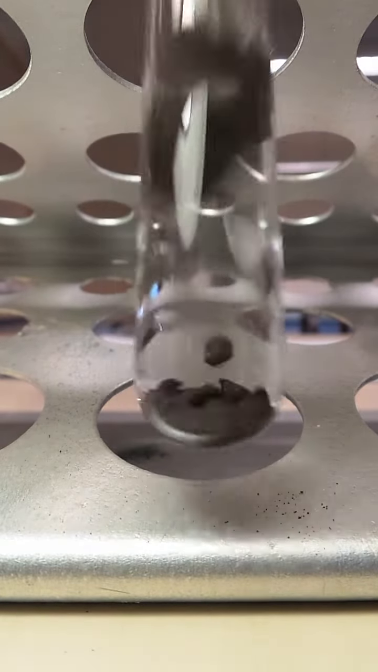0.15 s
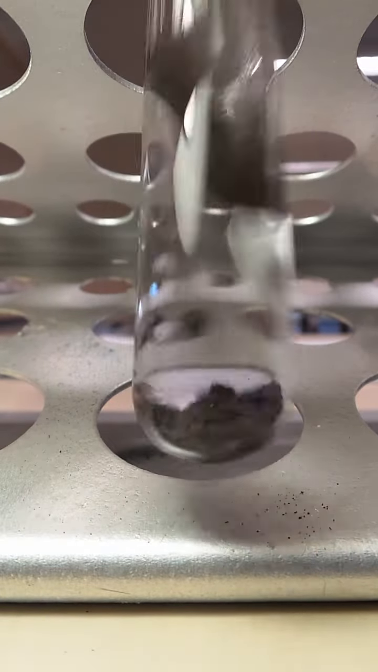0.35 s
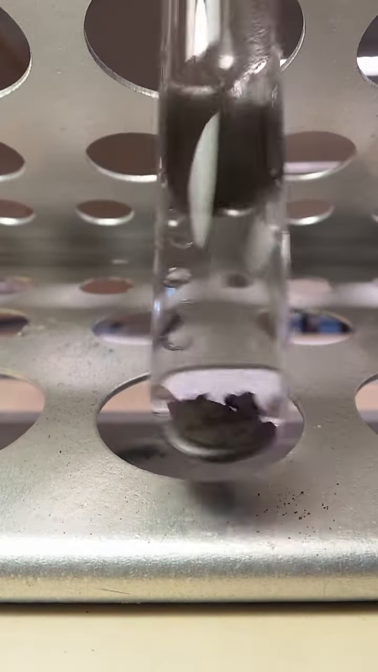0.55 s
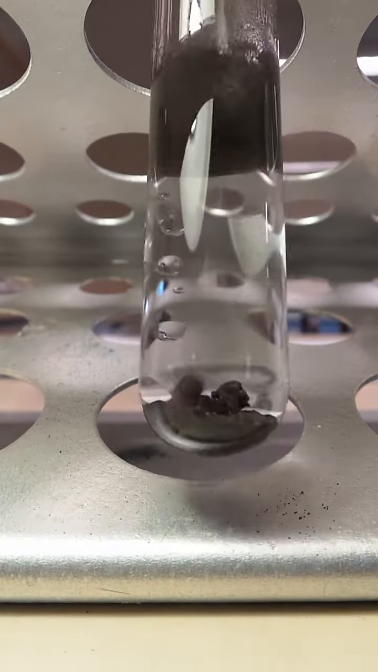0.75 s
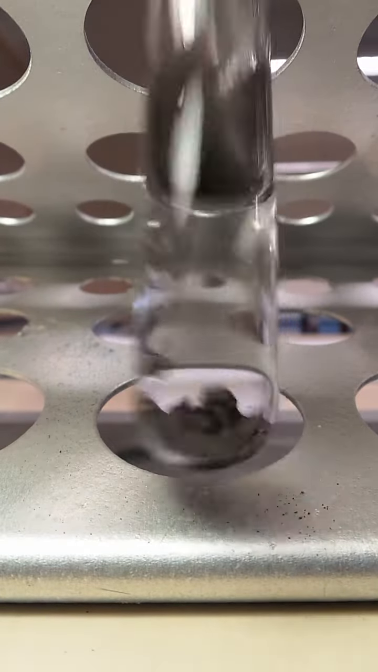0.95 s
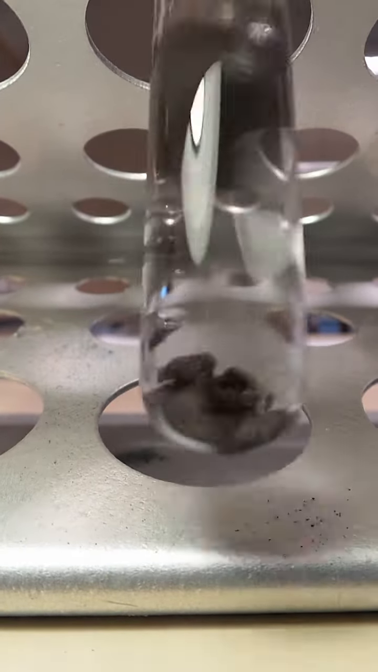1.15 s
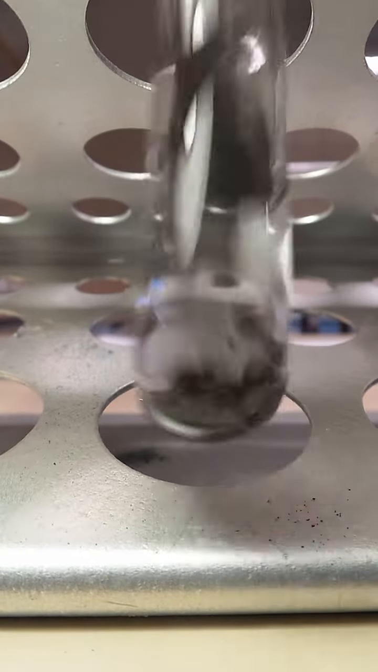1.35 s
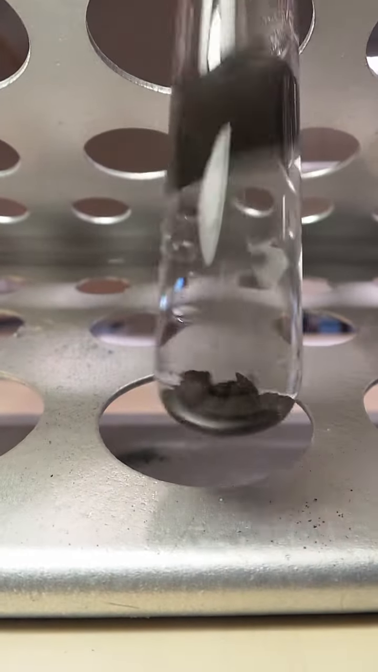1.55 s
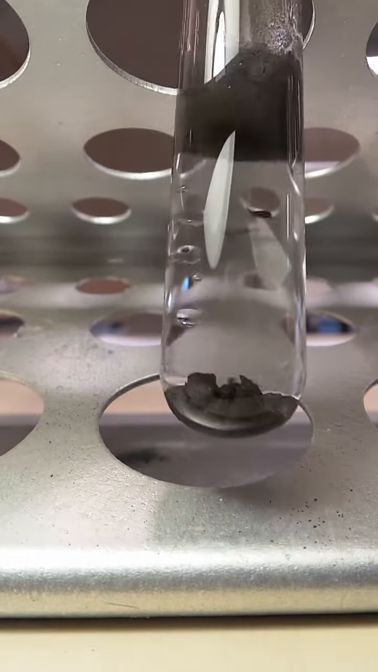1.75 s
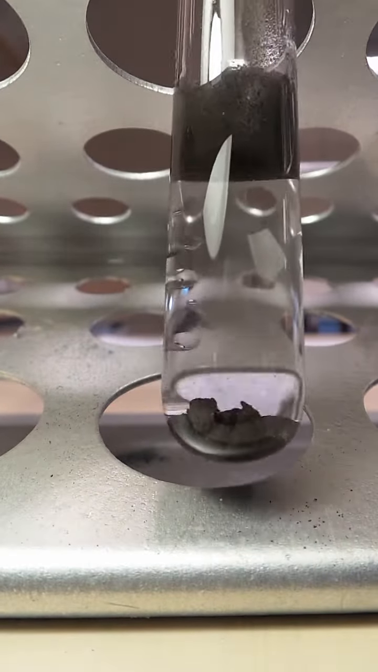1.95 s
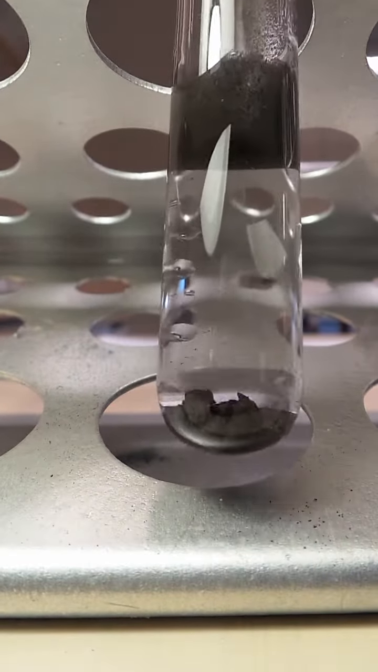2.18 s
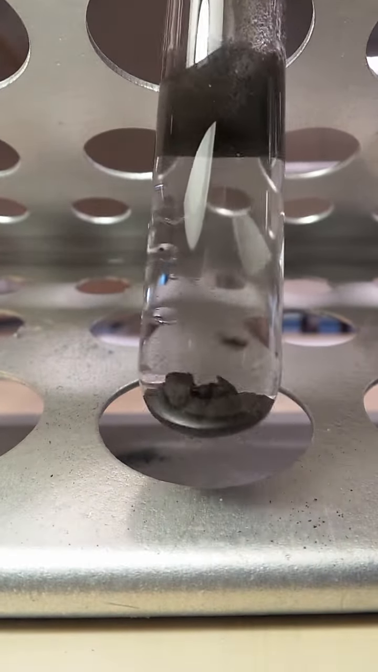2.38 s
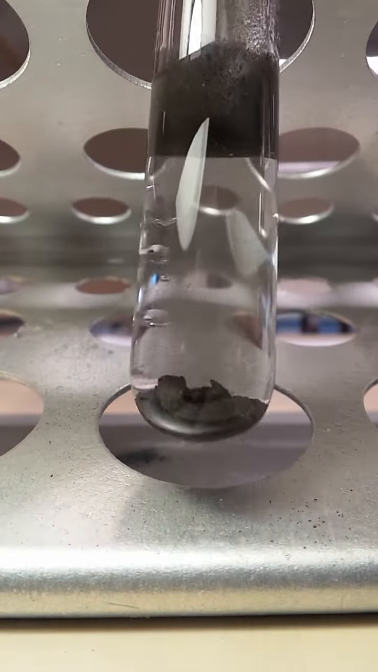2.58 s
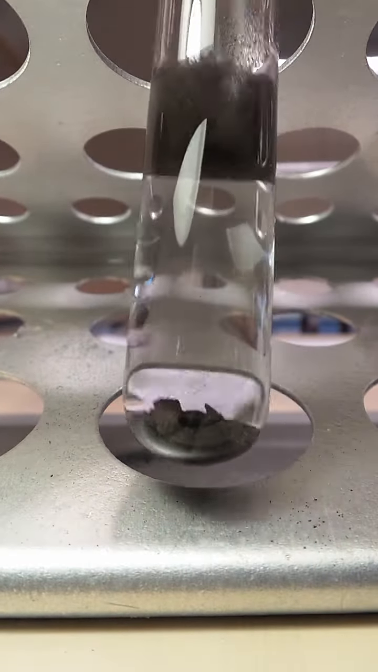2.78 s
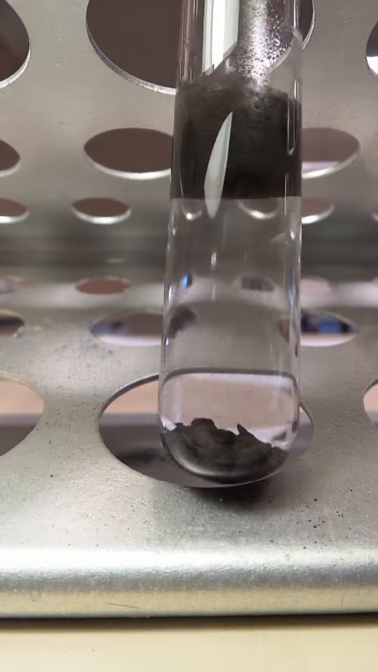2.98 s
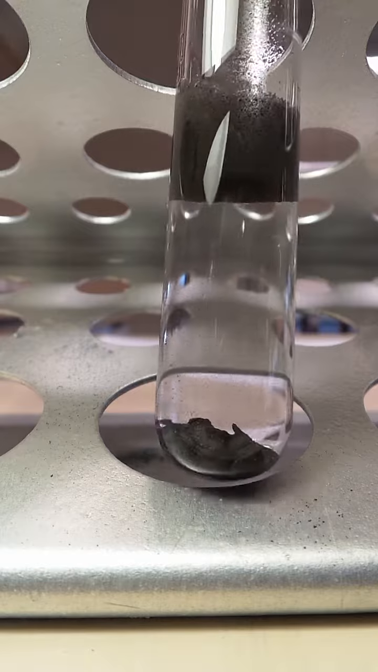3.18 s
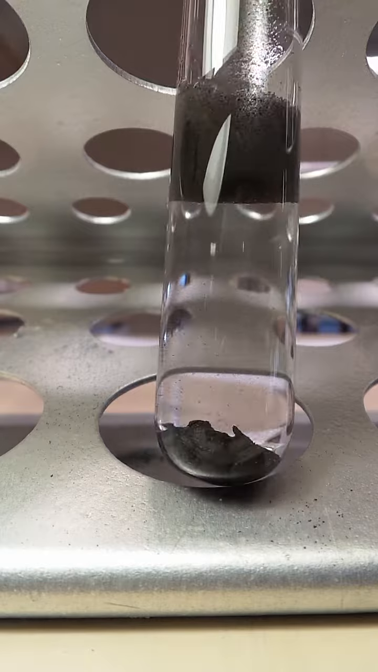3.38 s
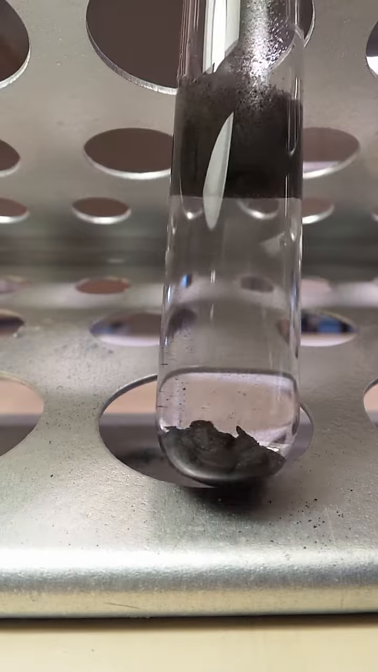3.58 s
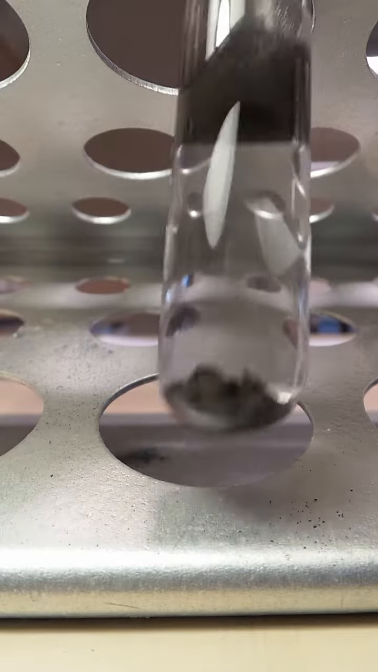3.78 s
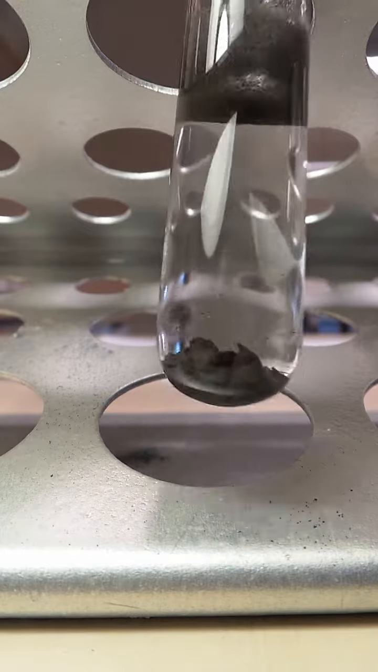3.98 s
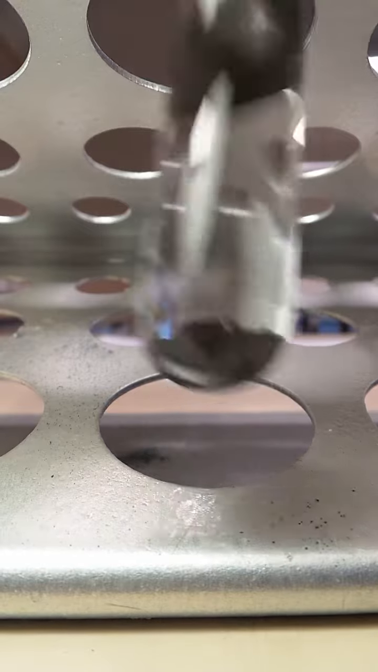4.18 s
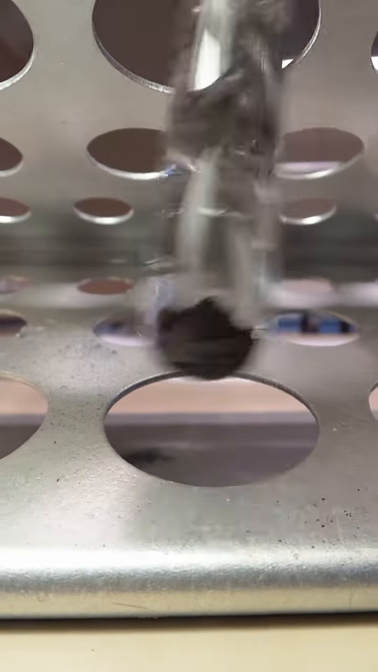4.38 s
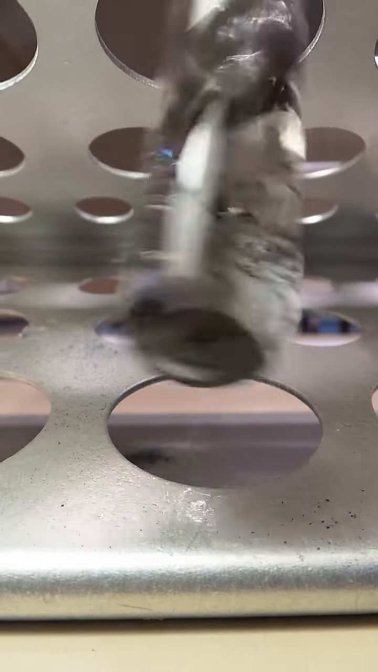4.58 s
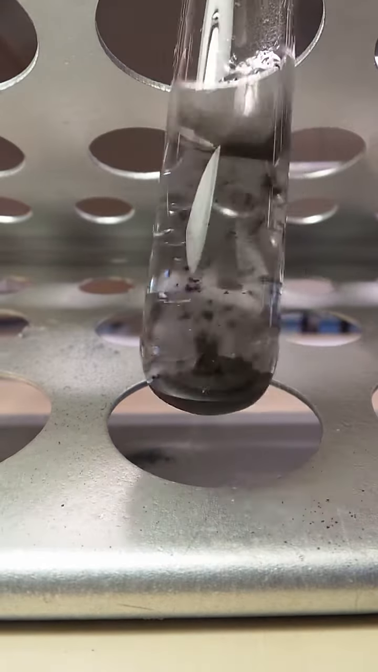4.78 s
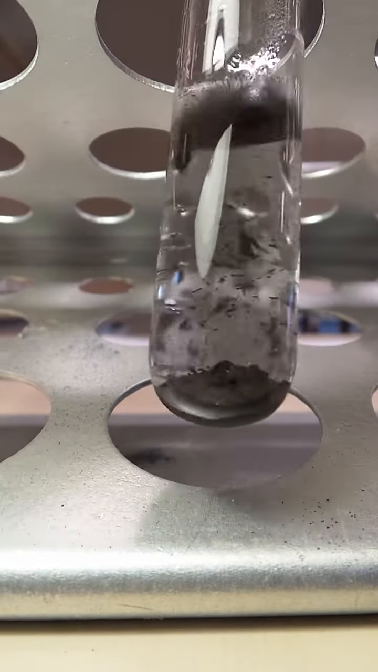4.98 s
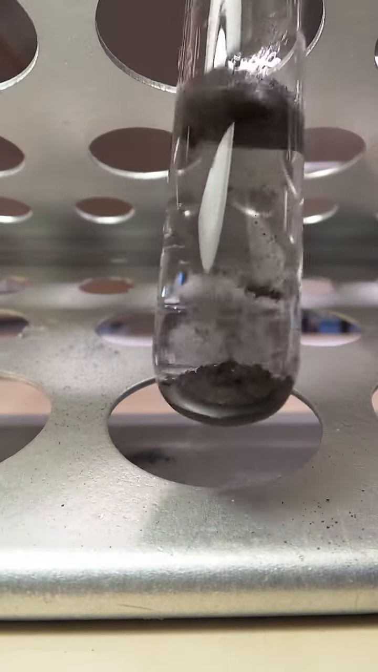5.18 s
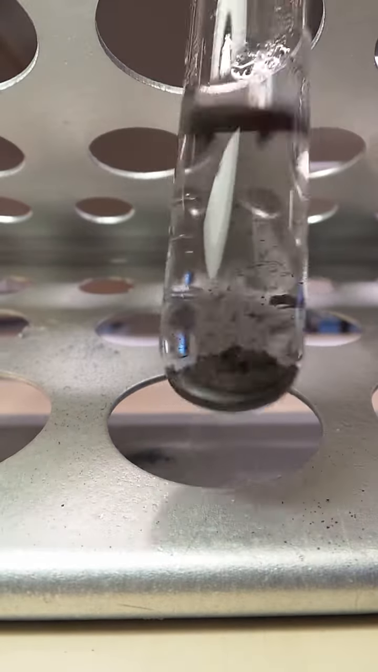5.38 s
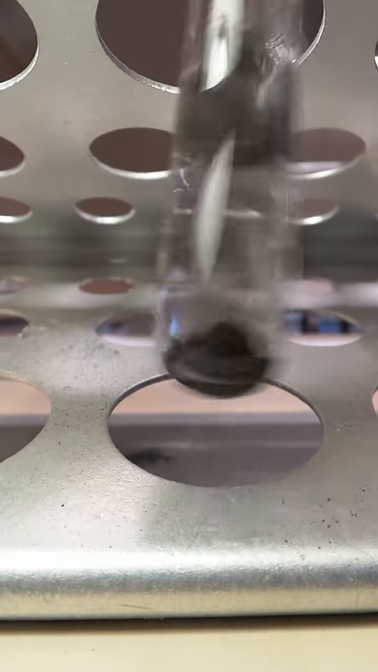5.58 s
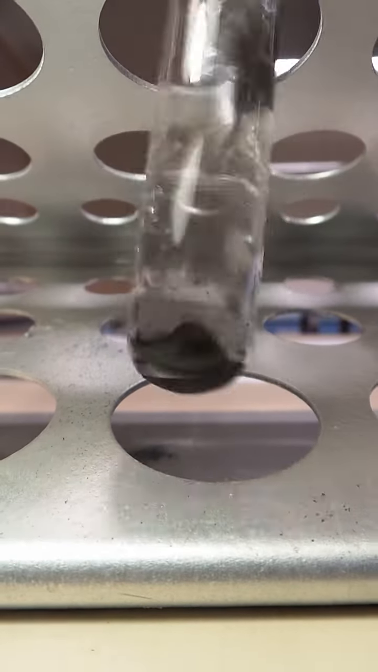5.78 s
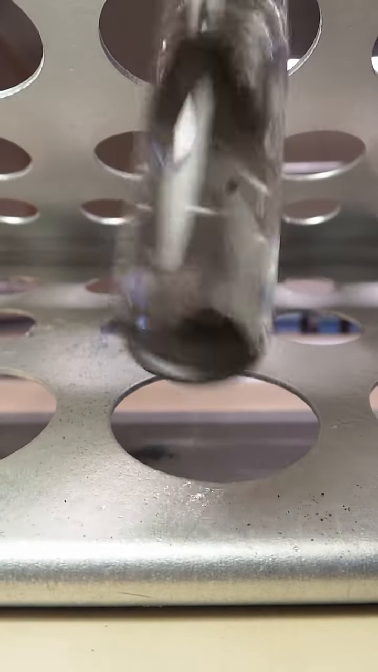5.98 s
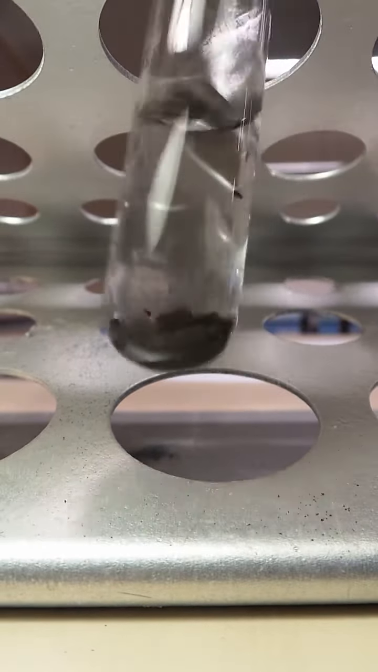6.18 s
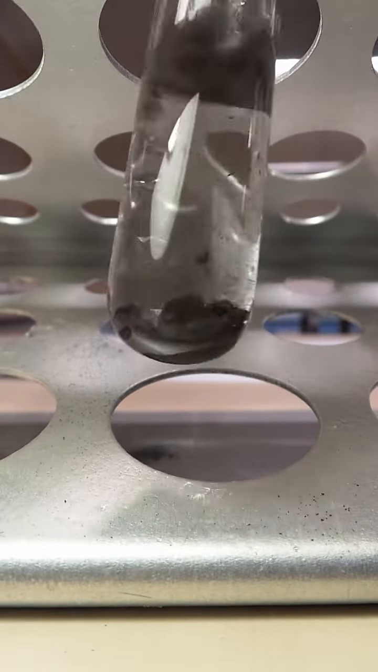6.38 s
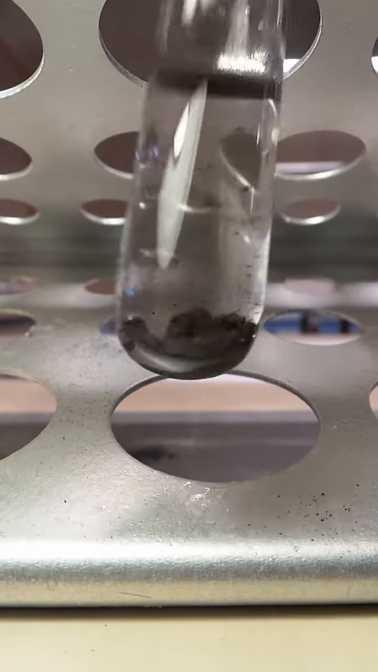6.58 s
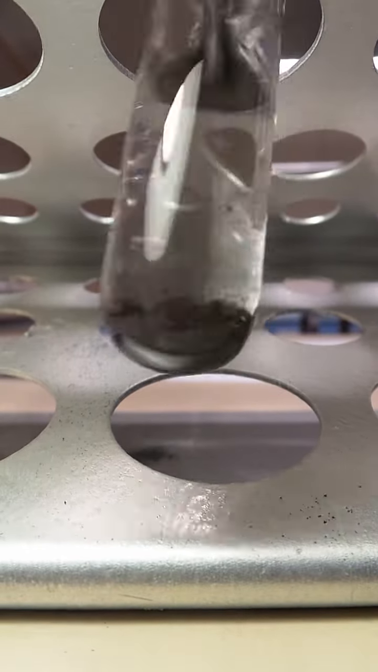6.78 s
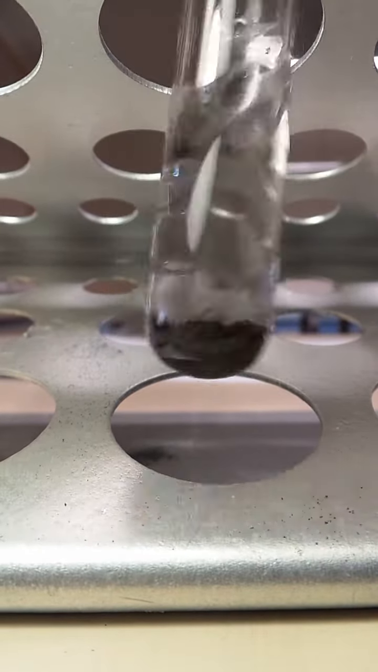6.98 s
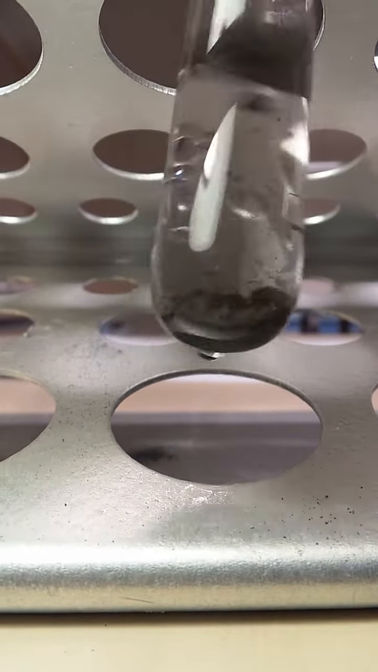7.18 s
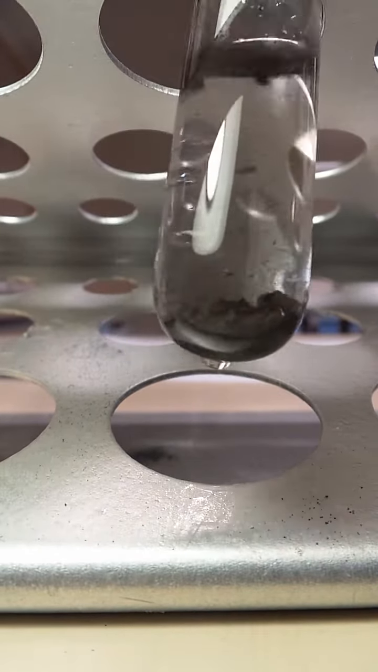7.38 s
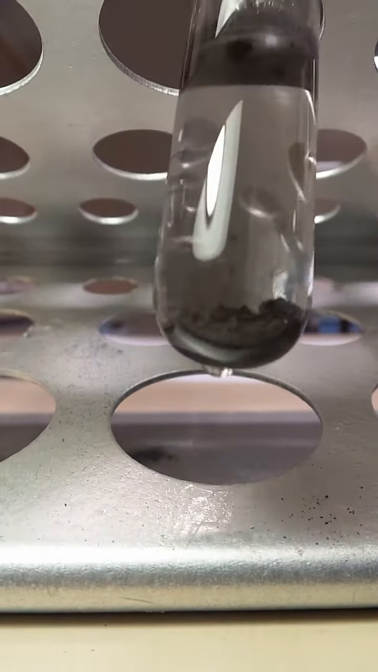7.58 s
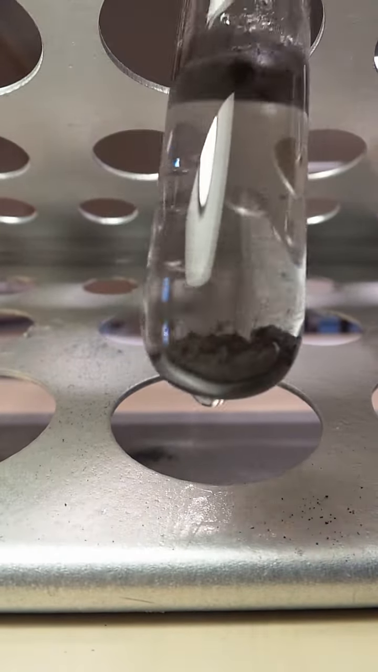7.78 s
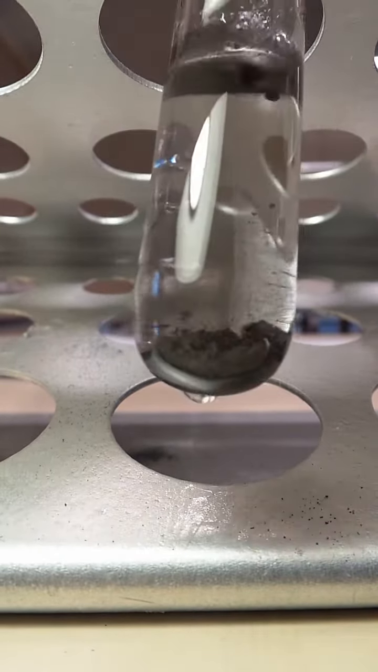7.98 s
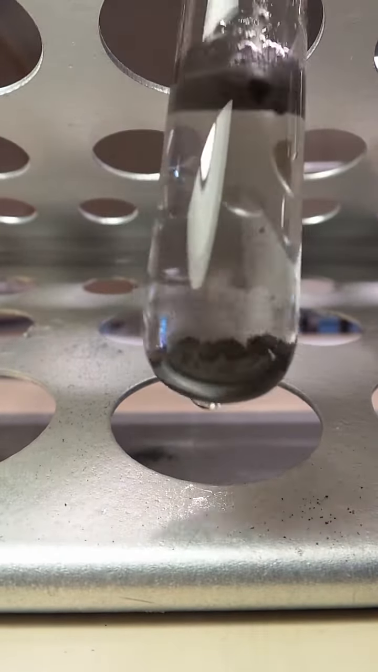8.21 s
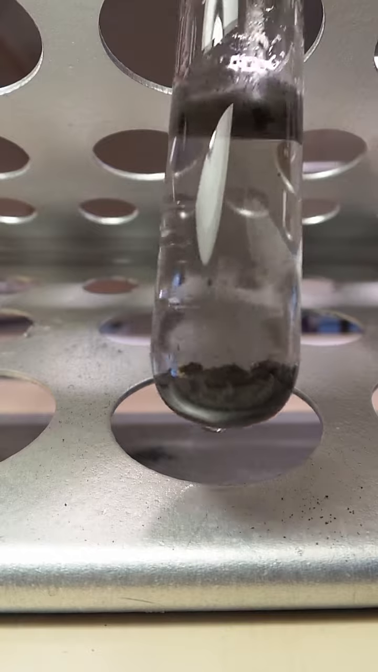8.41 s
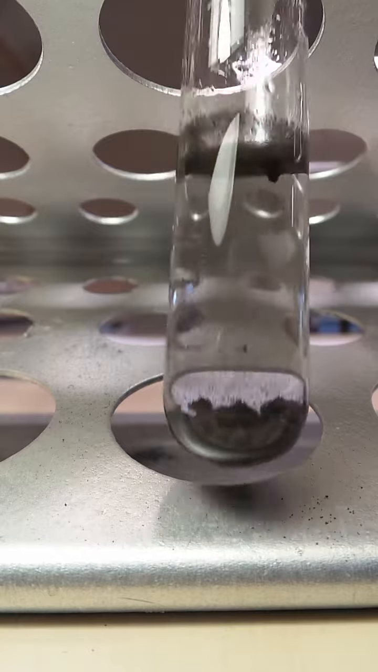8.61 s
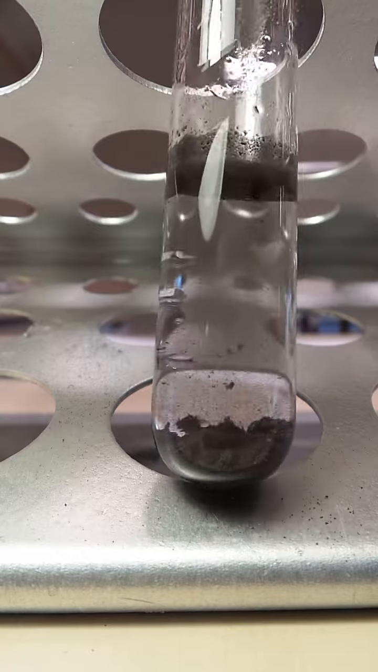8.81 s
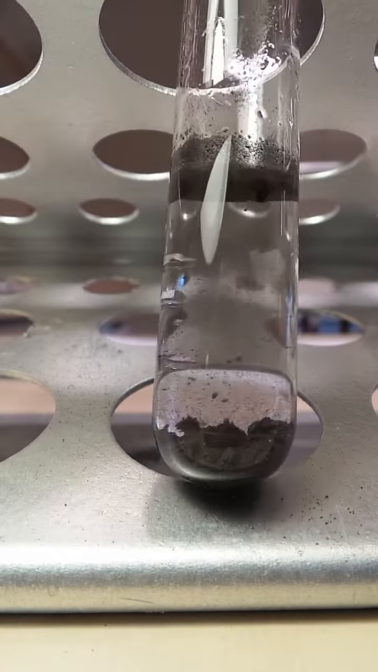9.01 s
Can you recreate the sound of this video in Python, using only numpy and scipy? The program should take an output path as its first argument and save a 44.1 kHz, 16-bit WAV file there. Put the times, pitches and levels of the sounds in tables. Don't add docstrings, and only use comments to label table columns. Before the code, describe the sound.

Close clusters of sharp glass clinks on thin metal, each with a short bright ring and a tiny trembling rattle after it. A few open the scene, a quick run follows, then a long gap of low airy hum. Stronger irregular bouts return from four seconds to just past seven, separated by short gaps, before the steady ventilation hum is left alone. Small hard-walled room, slightly thinned phone treble.

```python
import sys
import numpy as np
from scipy import signal
from scipy.fft import rfft, irfft
from scipy.io import wavfile
from scipy.ndimage import uniform_filter1d, minimum_filter1d

SR = 44100
rng = np.random.default_rng(int(sys.argv[2]) if len(sys.argv) > 2 else 0)


def master_out(mix):
    frames = np.transpose(np.atleast_2d(mix))
    ceiling = np.clip(frames, -1, 1)
    pcm = np.round(ceiling * 32767).astype(np.int16)
    wavfile.write(sys.argv[1], SR, pcm)


def makeup_ratio(level_db):
    decades = np.asarray(level_db, float) / 20
    return 10 ** decades


N = 399105

ZONE_EDGES_HZ = [350, 3400, 5150, 7400, 10200, 14700]


def fade(t, t60):
    return np.exp(-np.log(1000) * t / t60)


def band_filter(order, edges_hz):
    return signal.butter(order, edges_hz, "band", fs=SR, output="sos")


def colour(x, points, bumps=()):
    hz = np.maximum(np.fft.rfftfreq(x.shape[-1], 1 / SR), 1)
    f, db = np.transpose(points)
    gain = makeup_ratio(np.interp(np.log(hz), np.log(f), db))
    for centre, width, lift_db in bumps:
        gain = gain * makeup_ratio(lift_db / (1 + (2 * (hz - centre) / width) ** 2))
    y = irfft(rfft(x) * gain, x.shape[-1])
    return y / np.sqrt(np.mean(y ** 2))


def walk(rate):
    k = int(SR / rate)
    steps = np.repeat(rng.standard_normal(N // k + 1), k)
    return uniform_filter1d(uniform_filter1d(steps, k), k)[:N]


def hum():
    # f/Hz, level per Hz/dB
    air_curve = [(15, -70), (25, -34), (82, -6.5), (140, -8), (171, -4), (203, -8.5), (266, -11),
                 (286, -13.5), (366, -12), (425, -22.5), (480, -18.5), (1110, -31), (3620, -40.5),
                 (9000, -56.5), (11700, -70), (19800, -120)]
    # f/Hz, width/Hz, level over the air noise/dB
    resonances = [(84, 6.7, 0), (131, 23, 2), (173.6, 8.4, 10), (259.2, 17, 2.5), (375, 87, 3),
                  (478, 17.4, 7), (737, 13.7, 10), (810, 110, 5), (1690, 32, 3.5), (4020, 280, 3)]
    air = colour(rng.standard_normal(N), air_curve, resonances)
    bass = signal.sosfiltfilt(signal.butter(2, 300, fs=SR, output="sos"), air)
    swelling_bass = bass * makeup_ratio(0.5 * walk(2.8))
    smooth_hiss = (air - bass) * makeup_ratio(0.086 * walk(4.29))
    return makeup_ratio(-27) * (swelling_bass + smooth_hiss)


def room(x, level_db=-15, t60=0.32, top_hz=6250):
    t = np.arange(SR // 2) / SR
    noise = rng.standard_normal((2, len(t)))
    dull = signal.lfilter(*signal.butter(1, top_hz, fs=SR), noise[0]) * fade(t, t60)
    bright = makeup_ratio(6.5) * noise[1] * fade(t, 0.051)
    tail = (dull + bright) * np.minimum(t / 0.0024, 1)
    return makeup_ratio(level_db) * signal.fftconvolve(x, tail / np.sqrt(np.sum(tail ** 2)))[:N]


def chatter(knocks, per_s=420, spread_db=3.0, t60=0.51, level_db=-17.0, bench_db=10.0):
    t = np.arange(SR // 3) / SR
    tremble = fade(t, t60 / 2) * np.minimum(t / 0.0047, 1)
    shake = signal.fftconvolve(knocks ** 2, tremble)[:N] / 300
    strength = makeup_ratio(spread_db * np.minimum(rng.exponential(size=N), 2))
    ticks = (rng.random(N) < per_s / SR) * strength
    grain = rng.standard_normal(SR // 50) * fade(t[:SR // 50], 0.019)
    rattle = signal.fftconvolve(ticks * np.sqrt(np.abs(shake)), grain)[:N]
    body = signal.sosfilt(band_filter(2, [900, 7000]), rattle)
    bench = signal.sosfilt(band_filter(2, [380, 950]), rattle)
    return makeup_ratio(level_db) * (body + makeup_ratio(bench_db) * bench)


def contact_cracks(t):
    # level against the ring/dB, t60/s
    burst = [
        (-7, 0.094),
        (-0.5, 0.054),
        (-8.5, 0.025),
        (2, 0.045),
        (-9, 0.0055),
    ]
    noise = rng.standard_normal(len(t))
    cracks = []
    for low, high, (db, t60) in zip(ZONE_EDGES_HZ, ZONE_EDGES_HZ[1:], burst):
        crack = signal.sosfilt(band_filter(2, [low, high]), noise)
        cracks.append(crack * makeup_ratio(db) * fade(t, t60) / np.std(crack))
    return cracks


def mode_rings(t, flutter, scatter_db=2.0, detune=0.0012, early_t60=0.03, early_db=14.0, grip=1.24):
    rack_hz = [480, 620, 716, 1105, 1350, 1798, 1870, 1985, 2165, 2460, 2610, 2905, 3090, 3735, 3950, 4050,
               4115, 4240, 4470, 4705]
    tube_hz = [5350, 5670, 6560, 6660, 7012, 7840, 7951, 8258, 8540, 9410, 9940, 10500, 10950, 11270, 11816,
               12560, 13150, 13330, 13680, 14460]
    # level/dB, t60/s
    rack_modes = [(-1, .12), (-3, .08), (2, .1), (-3, .14), (-12, .1), (3, .078), (0, .13), (6, .07),
                  (4.5, .11), (3, .069), (-3, .14), (-4, .15), (-2, .12), (-3, .12), (5, .06), (8, .1),
                  (10.5, .1), (6, .11), (3, .114), (2, .059)]
    # level/dB, t60/s
    tube_modes = [(-8, .12), (3, .12), (11, .11), (5, .08), (3, .071), (-6, .089), (2, .064), (-2, .105),
                  (-4, .073), (8, .08), (-13, .09), (-7, .066), (-8, .12), (0, .1), (2, .17), (-13, .08),
                  (-4, .12), (2, .148), (-9, .12), (-8, .05)]
    hz = np.array([*rack_hz, *tube_hz])[:, None]
    db, t60 = np.transpose([*rack_modes, *tube_modes])[:, :, None]
    spot, turn, off = rng.standard_normal((3, len(hz), 1))
    shape = fade(t, grip * t60) + makeup_ratio(early_db) * fade(t, early_t60)
    wave = np.sin(2 * np.pi * hz * (1 + detune * off) * t + 1.01 * turn)
    ring = makeup_ratio(db + scatter_db * spot) * shape * wave
    ring *= flutter[rng.integers(len(flutter), size=len(hz))]
    zone = np.searchsorted(ZONE_EDGES_HZ[1:], hz[:, 0])
    return [ring[zone == z].sum(axis=0) for z in range(5)]


def knock_list():
    # t/s, hole rim level/dB, sheet over the rim/dB, glass over the rim/dB
    hard_knocks = [(0.2966, -16, 2.5, -5), (0.4354, -28.5, 3, -7), (0.5514, -23, 3, -3.5),
                   (1.029, -11, 4, -3), (1.1151, -15, 4, 1.5), (1.1737, -17, -2.5, 2),
                   (1.3141, -13.5, 1.5, -6), (1.431, -11.5, 1.5, -0.5), (1.49, -15, 5.5, -1),
                   (1.5004, -17, 7, 3), (4.2323, -30, 6.5, 0), (4.2988, -19.5, 3.5, -4),
                   (4.382, -6, -4, -6), (4.4390, -9.5, 3, -6), (4.5072, -7.5, -4, -11),
                   (4.5545, -20, -2, 4), (4.564, -12.5, 5.5, -3.5), (4.6266, -17.5, -2, -3),
                   (4.6875, -18.5, 2.5, -5), (5.6467, -12, 4.5, -1), (5.7606, -8, -3, -4),
                   (5.82, -8, 0.5, -4), (5.9545, -11.5, 1.5, -2), (6.0225, -9.5, -3, -5.5),
                   (6.1598, -25.5, 4.5, -2), (6.6741, -10.5, -2, -8), (6.8312, -5.5, -1.5, -6),
                   (6.9247, -22, 1.5, 3), (6.9814, -7.5, -3.5, -9.5), (7.1175, -14, -1.5, -8.5)]
    # t/s, hole rim level/dB, glass over the rim/dB
    light_contacts = [(0.3385, -29.5, 5.5), (0.5868, -37.5, 6), (1.059, -24, -2), (1.075, -35, -8),
                      (1.1387, -23, 5.5), (1.3712, -27, 4.5), (1.3808, -25, -5), (1.5196, -21, 4),
                      (1.549, -28.5, 5), (1.606, -38, -13), (4.3395, -27, 7), (4.491, -41, -4), (4.665, -27, 1),
                      (4.534, -18, -3), (4.701, -22.5, 0), (4.72, -26.5, -1), (4.7548, -31.5, -7),
                      (5.6885, -29, -4), (5.707, -33, 2), (5.877, -27.5, 4.5), (5.9187, -32, 1), (6.076, -32, 6),
                      (6.0876, -30, 7), (6.2377, -41, -4), (6.721, -26, -0.5), (6.8564, -34, -9),
                      (6.8944, -27.5, 1), (7.005, -36, -5), (7.0513, -27, 6), (7.1586, -35, -4),
                      (3.99, -50.5, -5),
        (4.0804, -47.5, 7),
        (4.370, -41, -3),
        (5.4684, -41, -8),
        (5.8071, -27, 3),
        (6.012, -33, -3),
    ]
    hard_glass = [1.7, -4, -0.5]
    light_glass = [-0.8, -10, -1]
    # start t/s, wall level/dB, lip level/dB
    bouts = [
        (0, 1.5, 0.5),
        (0.9, 2, -1),
        (3.9, 0.5, -0.1),
        (5.4, 3, -1),
        (6.5, -1, -1),
    ]
    contacts = [(s, rim, sheet, np.add(glass, hard_glass)) for s, rim, sheet, glass in hard_knocks]
    for s, rim, glass in light_contacts:
        contacts.append((s, rim, 0.5, np.add(glass, light_glass)))
    listed = []
    for s, rim, sheet, glass in contacts:
        _, wall_db, lip_db = [bout for bout in bouts if bout[0] <= s][-1]
        listed.append((s, rim, [sheet, 0, *np.add(glass, [0, wall_db, lip_db])]))
    return listed


def clinks(rough_db=2.2, ring_db=-6.0):
    t = np.arange(SR // 5) / SR
    flutter = uniform_filter1d(rng.standard_normal((64, len(t))), size=400)
    flutter = makeup_ratio(rough_db * flutter / np.std(flutter))
    onset = np.minimum(t / 0.0005, 1)
    out = np.zeros(N + len(t))
    for s, rim_db, zone_db in knock_list():
        i = int(s * SR)
        for modes, crack, share_db in zip(mode_rings(t, flutter), contact_cracks(t), zone_db):
            sound = modes / np.std(modes[:SR // 200]) + crack
            out[i:i + len(t)] += makeup_ratio(rim_db + share_db + ring_db) * sound * onset
    return out[:N]


def scene():
    knocks = clinks()
    knocks = knocks + chatter(knocks)
    return np.tile(knocks + room(knocks) + hum(), (2, 1))


def gate(x, gate_db=-87, mask_db=-1.5, patchy_db=5):
    # f/Hz, level over the gate/dB
    gate_curve = [(5000, -18), (7000, -10), (8500, -1.5), (9500, 0), (11000, 1.5), (13500, 1.5), (15000, 4)]
    hz, _, lines = signal.stft(x, SR, "cosine", nperseg=2048)
    size = np.abs(lines)
    f, db = np.transpose(gate_curve)
    loud = minimum_filter1d(np.sqrt(np.mean(size[hz > 5000] ** 2, axis=0)), size=3)
    share = rng.standard_normal((len(hz) // 32 + 1, len(loud)))
    share = np.repeat(share, 32, axis=0)[:len(hz)]
    masked = makeup_ratio(mask_db + patchy_db * share) * loud
    by_pitch = makeup_ratio(np.interp(hz, f, db, left=-np.inf))[:, None]
    limit = by_pitch * np.maximum(makeup_ratio(gate_db + share / 3), masked)
    kept = (size > limit) * np.maximum(1, 1.7 * limit / (size + 1e-12))
    return signal.istft(lines * kept, SR, "cosine", nperseg=2048)[1][:N]


def side_hiss():
    # start t/s, length/s, level/dB
    puffs = [
        (1.022, .025, -36),
        (4.517, .035, -38),
        (4.625, .025, -40),
        (5.66, .04, -43),
        (5.816, .04, -30),
        (6.01, .03, -35),
    ]
    t = np.arange(N) / SR
    hiss = signal.sosfilt(band_filter(1, [700, 12000]), rng.standard_normal(N))
    return hiss * sum(makeup_ratio(db) * np.sin(np.pi * np.clip((t - s) / length, 0, 1)) for s, length, db in puffs)


def band_limit(x):
    return signal.sosfilt(signal.butter(12, 16080, fs=SR, output="sos"), x)


def record(dry):
    heard = dry[0] + makeup_ratio(-59.6) * rng.standard_normal(N)
    top_cut = signal.ellip(8, 0.2, 40, 14680, fs=SR, output="sos")
    cut = signal.sosfilt(top_cut, heard)
    mid = gate(np.tanh(0.86 * cut) / 0.76)
    side = side_hiss()
    return band_limit(np.array([mid + side, mid - side]))


dry = scene()
out = record(dry)
master_out(out)
```